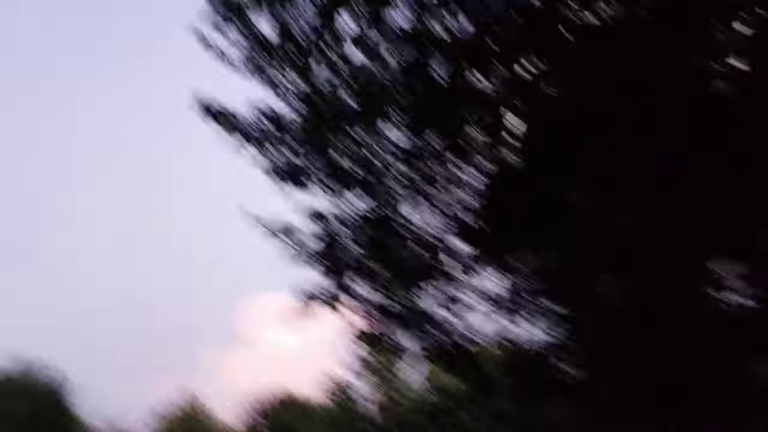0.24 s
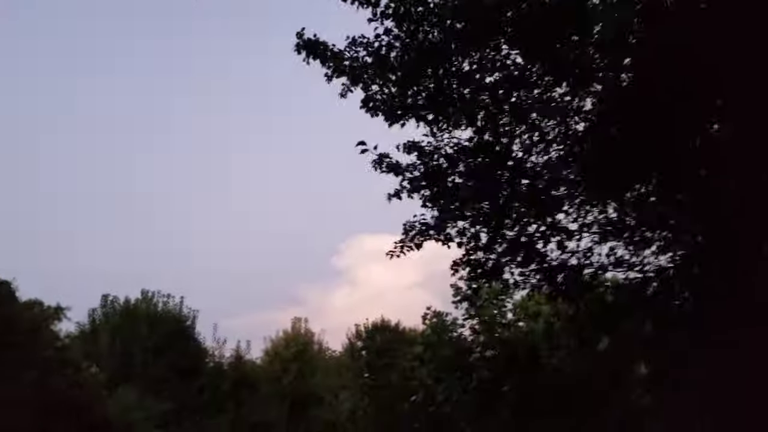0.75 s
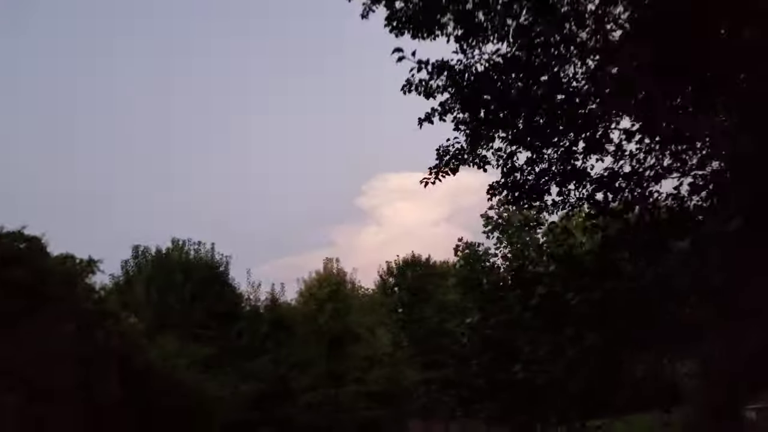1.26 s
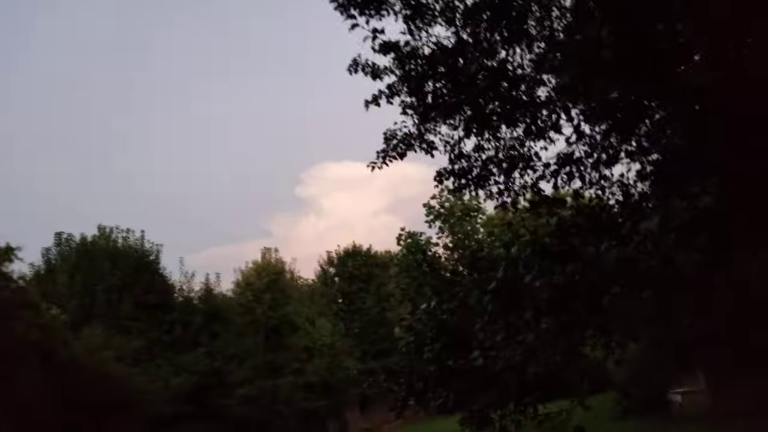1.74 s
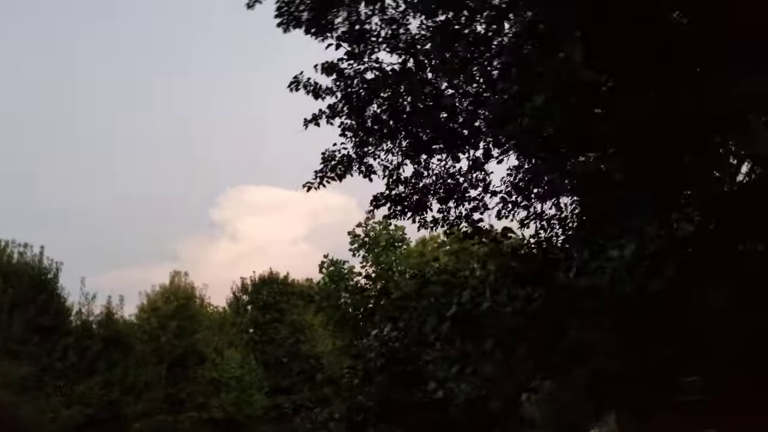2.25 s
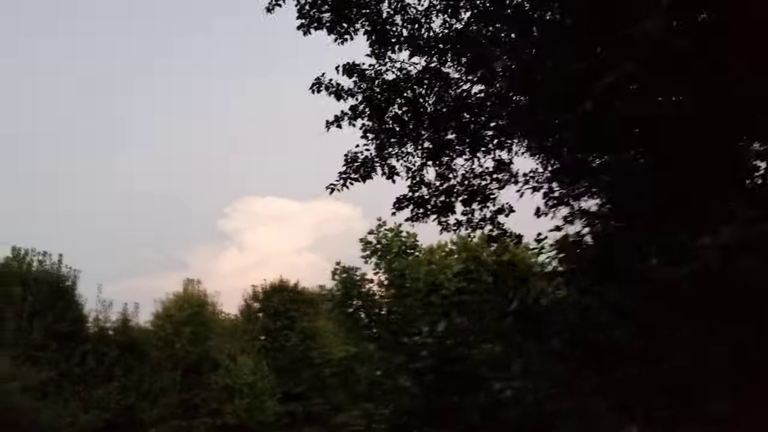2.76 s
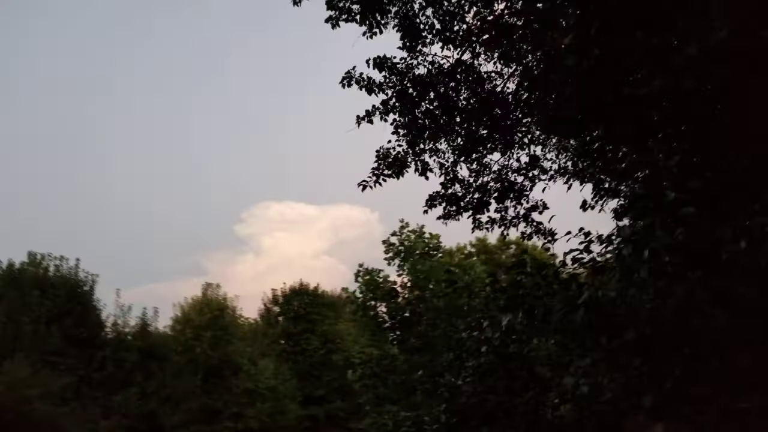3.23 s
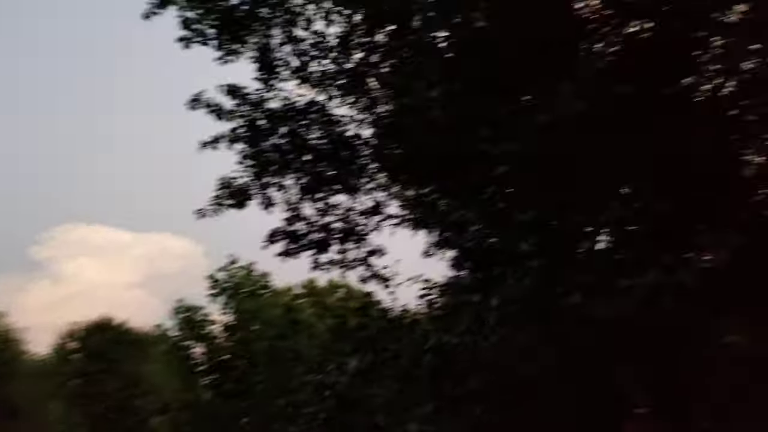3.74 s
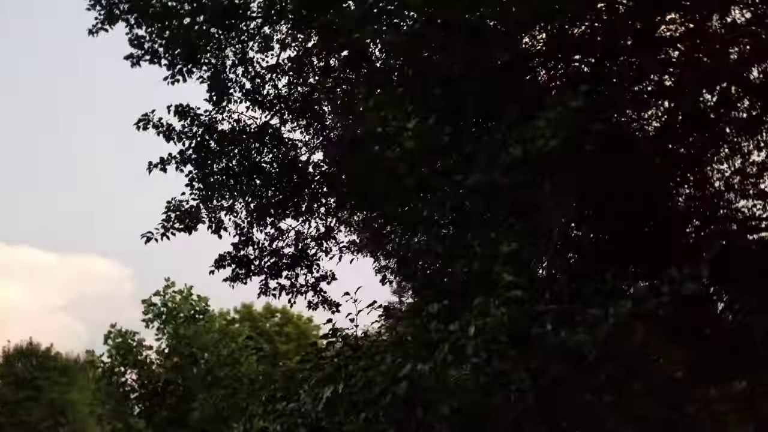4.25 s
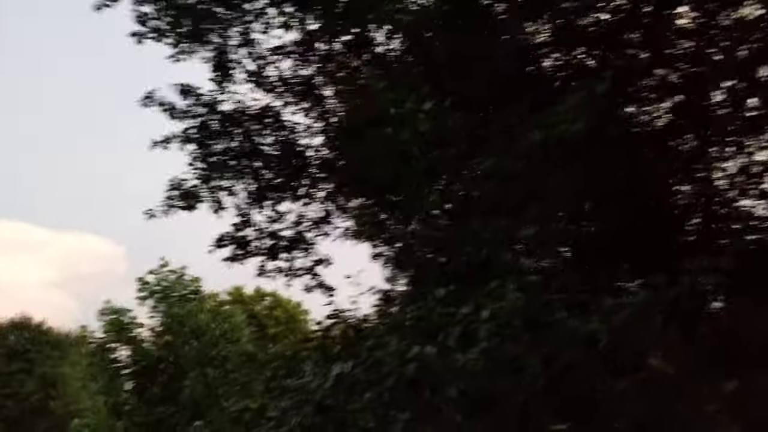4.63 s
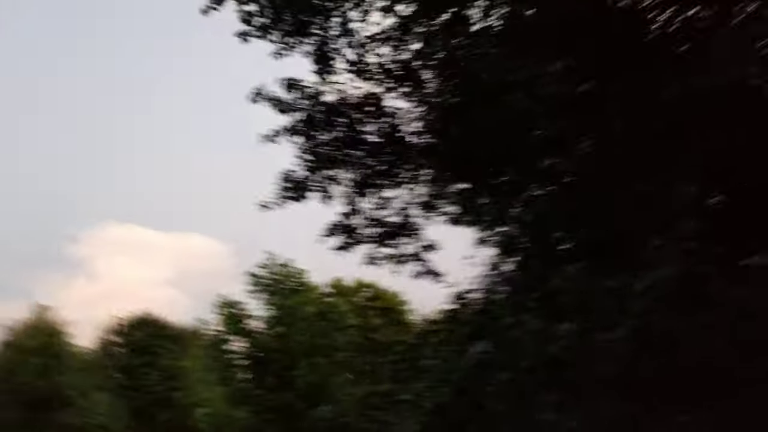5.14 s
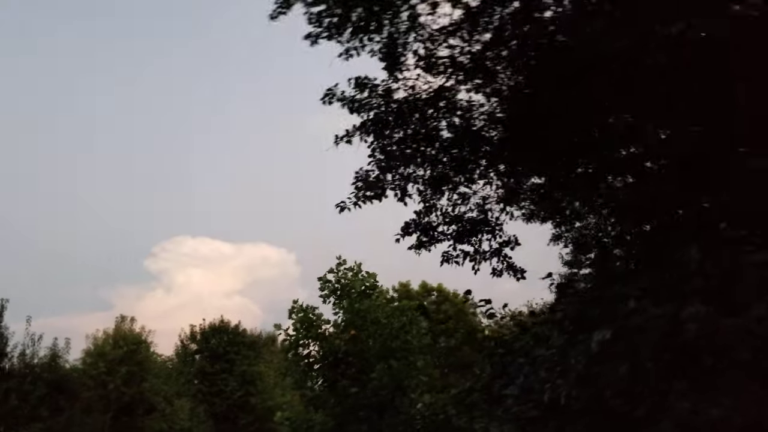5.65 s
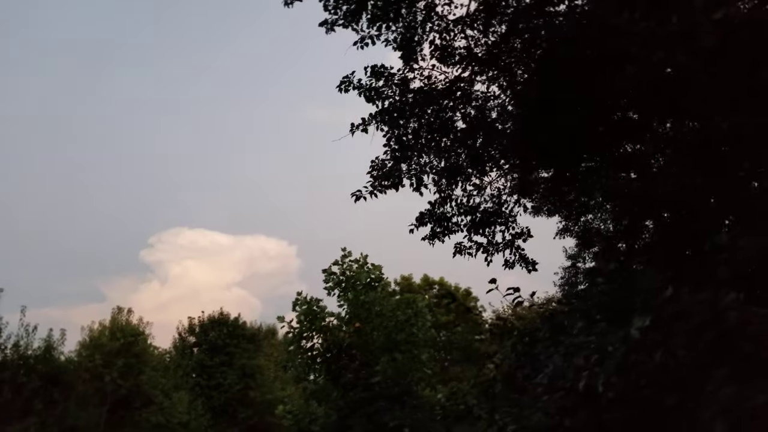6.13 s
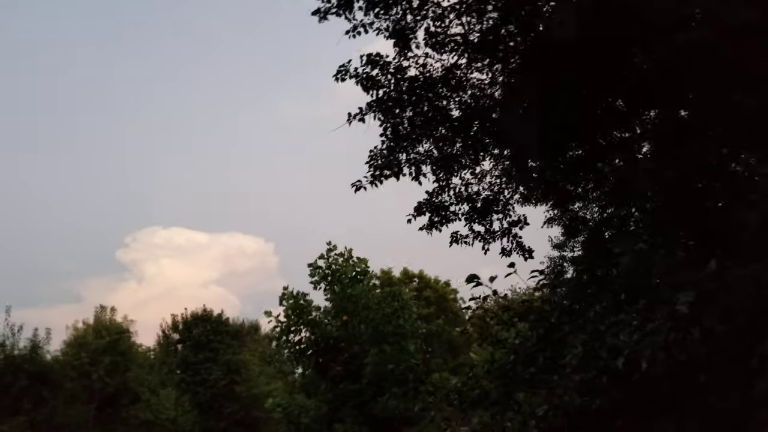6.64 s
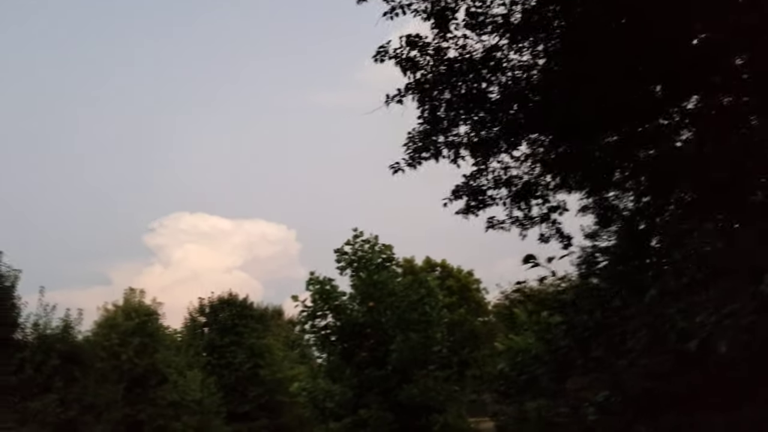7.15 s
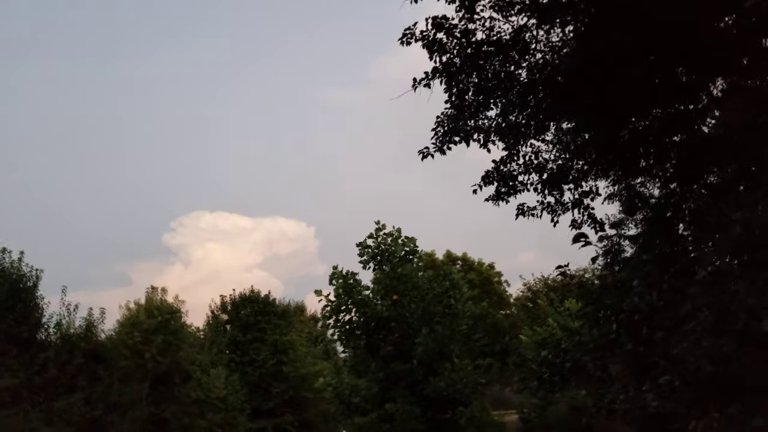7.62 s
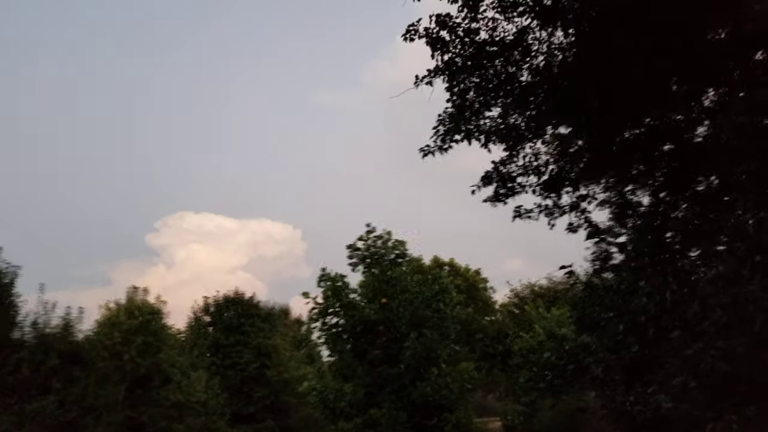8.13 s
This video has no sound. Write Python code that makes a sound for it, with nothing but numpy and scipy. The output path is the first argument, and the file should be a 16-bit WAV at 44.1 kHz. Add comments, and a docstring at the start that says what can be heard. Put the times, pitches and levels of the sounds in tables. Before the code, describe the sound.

Evening insects in trees: pulsing shrill katydids, a nearby cicada's buzz swelling with brief regular hitches, and a low cooling-unit rumble with faint whine.

```python
"""Dusk among trees. After half a second of silence a band of katydids fades in, throbbing four times a
second over a hiss of far cicadas, as a cooling unit rumbles and hums. One near cicada winds up from a slow,
slack buzz to a full one near 6 s, broken by short pauses: clicks ring its body and rasp in the treble.
From about 2 s the unit's rush of air and whine come forward; a hand-held stereo pair of ports turns a little.
After 5 s the katydids' throb grows shallower as they drift apart."""
import sys
import numpy as np
from scipy import signal
from scipy.fft import rfft, irfft, next_fast_len
from scipy.io import wavfile
from scipy.ndimage import map_coordinates

SR = 44100
rng = np.random.default_rng(int(sys.argv[2]) if len(sys.argv) > 2 else 0)


def wav_out(sig):
    """Save sig, one row per channel (or a flat mono array), as 16-bit PCM at SR to the path in sys.argv[1]."""
    wavfile.write(sys.argv[1], SR, np.round(np.clip(np.atleast_2d(sig).T, -1, 1) * 32767).astype(np.int16))


def convert_level_to_amplitude(level_db):
    """Map a level in decibels to its linear amplitude factor."""
    exponent = np.asarray(level_db, float) / 20
    return 10 ** exponent


N = 369558  # length in samples, about 8.4 s


def evened(x):
    """Scales so that the mean of the channels has rms 1."""
    mean_power = np.mean(np.atleast_2d(x).mean(0) ** 2)
    return x / np.sqrt(mean_power + 1e-20)


def read_spectrum(points, hz):
    """Reads a spectrum joined by straight lines on a log frequency axis."""
    point_hz, value = np.transpose(points)
    return np.interp(np.log(hz + 1), np.log(point_hz + 1), value)


def curves(rows):
    """Turns a table whose first column is time into one smooth-running curve per other column."""
    time_s, *values = np.transpose(rows)
    t = np.arange(N) / SR
    return [np.interp(t, time_s, v) for v in values]


def colour(x, points):
    """Filters by a spectrum in dB."""
    size = next_fast_len(N)
    gain = convert_level_to_amplitude(read_spectrum(points, np.fft.rfftfreq(size, 1 / SR)))
    return irfft(rfft(x, size) * gain, size)[..., :N]


def resonate(x, hz, width):
    """Shifts the curve hz to zero, smooths twice, shifts back: a steep resonance of gain 1."""
    turn = np.exp(2j * np.pi * np.cumsum(hz * np.ones(N)) / SR)
    r = np.exp(-np.pi * width / SR)
    smooth = signal.lfilter([(1 - r) ** 2], [1, -2 * r, r * r], x / turn)
    return 2 * (turn * smooth).real


def wander(top_hz, count=1):
    """Slow random curves of rms 1, low-passed at top_hz and drawn at one point per 100 samples."""
    lowpass = signal.butter(2, top_hz, fs=SR / 100, output="sos")
    slow = signal.sosfilt(lowpass, rng.standard_normal((count, N // 100 + 2)))
    return np.array([np.interp(np.arange(N) / 100, np.arange(len(r)), r / r.std()) for r in slow])


def clicks(per_s, spread_db, channels=1):
    """Random clicks of either sign, a few large."""
    shape = (channels, N)
    size = convert_level_to_amplitude(spread_db * np.minimum(rng.exponential(1, shape), 4))
    sign = rng.choice([-1., 1.], shape)
    return size * sign * (rng.random(shape) < per_s / SR)


def foliage(x, t60, sway_hz):
    """Trunks and boughs echo the sound differently to each port; the paths change as the hand sways."""
    t = np.arange(SR // 3) / SR
    tails = rng.standard_normal((3, 2, len(t))) * convert_level_to_amplitude(-60 * t / t60) * (t > .002)
    tails = tails / np.linalg.norm(tails[0, 0])
    # three echo paths take turns; their shares of power always add up to the same
    turn = np.pi * (sway_hz * np.arange(N) / SR + np.arange(3)[:, None] / 3)
    feeds = x * np.sqrt(2 / 3) * np.sin(turn)
    return signal.fftconvolve(feeds[:, None], tails, axes=2)[..., :N].sum(0)


# near cicada; slackness of the drum is 0 when taut, and the rasp is relative to the buzz
# columns: time_s, buzz_db, rasp_db, slackness [no unit]
SONG = [(1.4, -48, -16, 1.46), (1.9, -46.5, -9, 1.04), (2.7, -45, -7.5, 1.17), (3.6, -38.5, -12, .98),
        (4.65, -33.5, -14, 0.63), (5.25, -31.5, -10.5, .38), (5.6, -32.5, -12, .12),
        (6.6, -30.5, -15.5, 0.046), (7.3, -32.5, -8.5, 0.067), (8.38, -32.5, -11, 0.23)]
# the hand turns; columns: time_s, left_port_lag [samples]
LAG = [(2, -0.5), (3.4, -2), (5.7, 3.5), (8.38, 8.5)]
# the buzz stops for a moment; columns: middle_s, pause_db
PAUSES = [(1.712, -14), (2.063, -21), (2.433, -4), (2.76, -11), (3.073, -15), (3.368, -14), (3.669, -21),
          (3.953, -8), (4.226, -14), (4.506, -7), (4.783, -8), (5.08, -3.5), (5.381, -7), (5.727, -3.5),
          (6.111, -5), (6.506, -6.5), (6.893, -6), (7.249, -6), (7.59, -6), (7.922, -5), (8.265, -3.5)]
# air sac and drum membranes at full tension, and what each unit of slackness takes away
# columns: pitch_hz, width_hz [of each of two smoothings], level_db, drop_hz, weaker_db
BODY = [(2096, 226, -10, -8, 1.5), (2344, 88, -11.5, 59, -4.5), (2678, 330, -7.5, 97, -2),
        (2968, 132, 3, 85, 5), (3209, 284, -5.5, 62, -1.5), (3524, 170, -6.5, 204, 1.5),
        (3766, 200, -4, 282, 1), (4134, 560, -13.5, 90, 9.5), (4650, 580, -22, 2, 3),
        (5150, 430, -15.5, -6, 7.5)]
# shape of the treble rasp; columns: pitch_hz, level_db [per Hz]
RASP = [(5000, -65), (5900, -2.5), (7500, -10), (8300, -13), (8800, -8), (9400, 5.5), (11000, 4),
        (13000, -1.5), (14500, -5), (16000, -4)]
# extra level of the rasp's top treble; columns: time_s, level_db
TOP = [(1.4, -6), (4.4, 1.5), (5.5, 2.5), (5.8, 5), (6.9, 9), (7.3, 2), (8.38, 4.5)]
TOP_HZ = 12000  # the top treble starts here
TAUT_BEATS_HZ, SLACK_SLOWS_HZ = 239.2, 42.1  # average muscle beats per s; slowing per unit of slackness
STUTTER_SHARE = .7  # stutter depth as a share of the pause dB, per unit of slackness


def pauses_db(slack):
    """Each pause is a flat dip, then a short louder burst, then one stutter, deeper on a slack drum."""
    t = np.arange(N) / SR
    total_db = np.zeros(N)
    for s, db in PAUSES:
        dip = np.clip(1.6 - abs(t - s) / np.where(t < s, .008, .007), 0, 1)
        burst_db = 1.25 * np.exp(-((t - s - .019) / 0.011) ** 2)
        stutter = STUTTER_SHARE * slack * np.exp(-((t - s - .037) / .005) ** 2)
        total_db += db * dip + burst_db + db * stutter
    return total_db


def cicada():
    """Each muscle beat buckles a row of ribs: a burst of clicks that rings the body and rasps above it."""
    buzz_db, rasp_db, slack = curves(SONG)
    beat_hz = (TAUT_BEATS_HZ - SLACK_SLOWS_HZ * slack) * (1 + .012 * wander(30)[0])
    beat = np.cumsum(beat_hz) / SR % 1  # place within each beat, 0 to 1
    effort = (.5 + np.exp(-beat / 0.56)) * convert_level_to_amplitude(pauses_db(slack))
    ribs = evened(clicks(10000, 0.87)[0] * effort)
    left_time = np.arange(N) - curves(LAG)[0]
    left = map_coordinates(ribs, [left_time], order=5, mode="nearest")
    direct = np.array([left, ribs])
    # moving leaves return unrelated clicks whose power trails the effort by a few ms
    keep = np.exp(-1 / (0.0044 * SR))
    trail = np.sqrt(signal.lfilter([1 - keep], [1, -keep], effort ** 2))
    leaves = np.array([evened(c * trail) for c in clicks(15000, 1.5, channels=2)])
    trunks = foliage(ribs, .045, sway_hz=.7)
    low = direct + .75 * leaves + .85 * trunks
    high = direct + 1.1 * leaves + .75 * trunks
    body = np.zeros((2, N))
    for k, (hz, width, db, drop_hz, weaker_db) in enumerate(BODY):
        ring = resonate(low, hz - drop_hz * slack, width)
        # neighbouring modes swing in opposite phase
        body += (-1) ** k * convert_level_to_amplitude(db - weaker_db * slack) * ring
    rasp = evened(colour(high, RASP))
    highpass = signal.butter(3, TOP_HZ, "high", fs=SR, output="sos")
    top = signal.sosfiltfilt(highpass, rasp)
    rasp = rasp - top + convert_level_to_amplitude(curves(TOP)[0]) * top
    return convert_level_to_amplitude(buzz_db) * (evened(body) + convert_level_to_amplitude(rasp_db) * rasp)


# katydids fall out of step: the dips between crests change depth
# columns: time_s, crest_db, dip_db [relative to the crest]
CHORUS = [(.7, -34.5, -4.5), (1.8, -38.5, -7), (2.5, -37, -8.5), (3.7, -38.5, -6), (5, -37, -9),
          (6.2, -39, -3), (8.38, -40, -4)]
# ringing wings and their octave; columns: pitch_hz, width_hz [of the first resonance], level_db
WING = [(6564, 300, -4), (6900, 390, 3), (7177, 300, 1), (13750, 1600, -20.5)]
THROB_HZ, FIRST_CREST_S = 4.145, .72


def katydids():
    """Many wings scrape in step; each tooth strike rings the wing and its octave."""
    crest_db, dip_db = curves(CHORUS)
    throb = THROB_HZ * (np.arange(N) / SR - FIRST_CREST_S)
    level_db = crest_db + dip_db * np.sin(np.pi * throb) ** 2 + .5 * wander(3.7)[0]
    teeth = clicks(3500, 0.87, channels=2) * convert_level_to_amplitude(0.23 * wander(135, count=2))
    wings = np.zeros((2, N))
    for hz, width, db in WING:
        ring = resonate(teeth, hz, width)
        wings += convert_level_to_amplitude(db) * resonate(ring, hz, 1.16 * width)
    return convert_level_to_amplitude(level_db) * evened(wings)


# shape of far cicadas and leaves; columns: pitch_hz, level_db [per Hz, relative]
FAR = [(600, -6), (1600, -11.5), (2100, -6), (2500, 1.5), (3200, -10), (3900, -9.5), (5800, -13),
       (8200, -12), (9500, -11.5), (11500, -17.5), (12500, -39), (14500, -30), (16000, -47)]
FAR_DB = -47  # level around which the hiss drifts


def far_chorus():
    """So many distant callers that their clicks blur into a drifting hiss; one stand of trees is to the left."""
    left, right, stand = clicks(12000, 1.25, channels=3)
    early = np.roll(stand, -13)  # the stand reaches the left port 13 samples sooner
    drift_db = .6 * wander(3, count=2)
    both = np.array([left + 1.02 * early, right + 0.57 * stand])
    return convert_level_to_amplitude(FAR_DB + drift_db) * evened(colour(both, FAR))


# how alike the two ports hear the unit's noise; columns: pitch_hz, likeness [1 = the same]
SAME = [(60, 1), (270, 0.99), (500, 0.98), (900, 1), (1500, 0.85)]


def pair(points):
    """Noise of a given colour, nearly the same at both ports in the bass."""
    left, other = rfft(rng.standard_normal((2, N)))
    hz = np.fft.rfftfreq(N, 1 / SR)
    same = np.clip(read_spectrum(SAME, hz), -1, 1)
    right = same * left + np.sqrt(1 - same ** 2) * other
    return evened(irfft([left, right] * convert_level_to_amplitude(read_spectrum(points, hz)), N))


# the rush of air comes forward; columns: time_s, rush_db
UNIT = [(1.4, -88), (2.4, -53.5), (3.5, -50), (4.4, -46), (8.38, -47.5)]
# shape of the rumble; columns: pitch_hz, level_db [per Hz, relative]
RUMBLE = [(12, -49), (20, -25), (49, -9.5), (66, -11), (85, -4), (108, -7.5), (129, -3), (215, -3.5),
          (244, -6), (315, -4), (900, -25), (1170, -72), (1980, -120)]
RUMBLE_DB = -39.5
# shape of the rush of air; columns: pitch_hz, level_db [per Hz, relative]
RUSH = [(300, -10), (500, 2.5), (800, -8.5), (1200, -7), (1700, -8.5), (2300, -27.5)]
# fan tones; columns: pitch_hz, peak_db [wavers around this]
HUM = [(82.7, -42.5), (84.2, -46.5), (139, -50), (250, -48)]
# motor whine; columns: multiple [of the shaft speed], level_db [relative, wavers around this]
WHINE = [(14, -14), (15, -13), (17, -8), (18, -8.5), (19, -9), (20, -5), (21, 3.5), (22, -12), (23, -6),
         (31, -5)]
# the whine comes forward; columns: time_s, level_db
WHINE_LEVEL = [(1.5, -80), (2.35, -66.5), (3.5, -62), (3.8, -59.5), (4.8, -57.5), (8.38, -60)]
SHAFT_HZ = 58.83


def cooling_unit():
    """Steady rumble with wavering fan tones; its rush of air and motor whine come forward."""
    rush_db, whine_db = curves(UNIT)[0], curves(WHINE_LEVEL)[0]
    t = np.arange(N) / SR
    drift = wander(3.15, count=2 * len(HUM))  # one loudness and one phase curve per tone
    hum = np.zeros(N)
    for k, (hz, db) in enumerate(HUM):
        phase = 2 * np.pi * hz * t + 1.7 * drift[2 * k + 1]
        hum += convert_level_to_amplitude(db + 1.3 * drift[2 * k]) * np.sin(phase)
    shaft = 2 * np.pi * SHAFT_HZ * t + .025 * wander(1.5)[0]
    sway_db = 1.9 * wander(0.77, count=len(WHINE))  # each tone waxes and wanes by itself
    whine = np.zeros(N)
    for (multiple, db), sway in zip(WHINE, sway_db):
        whine += convert_level_to_amplitude(db + sway) * np.sin(multiple * shaft + 2 * np.pi * rng.random())
    rumble = convert_level_to_amplitude(RUMBLE_DB) * pair(RUMBLE)
    rush = convert_level_to_amplitude(rush_db) * pair(RUSH)
    return rumble + rush + hum + np.sqrt(2) * convert_level_to_amplitude(whine_db) * whine


def scene():
    """All callers and the machine together."""
    return cicada() + katydids() + far_chorus() + cooling_unit()


def low_pass(x):
    """Removes everything above the highest recorded frequency."""
    return signal.sosfilt(signal.butter(12, 16880, fs=SR, output="sos"), x)


# tone of the two ports; columns: pitch_hz, left_minus_right_db
BALANCE_DB = [(60, 0.5), (99, 0.5), (160, 0), (270, 0), (450, -2.5), (740, -1.5), (1220, -4), (2010, -8),
              (3330, -3), (5500, -10), (9080, -4), (11500, 0.5), (15500, -5)]
# fade-in, silent before the first row; columns: time_s, level_db
FADE = [(.528, -38.5), (.6, -26), (.68, -18.5), (.85, -12), (1.5, -5.5)]
EDGE_HZ = 15720  # nothing much passes above this


def record(dry):
    """The right port hears more of most of the treble; a band limit; silence, then a fade-in."""
    left = colour(dry[0], [(hz, db * .5) for hz, db in BALANCE_DB])
    right = colour(dry[1], [(hz, db * -.5) for hz, db in BALANCE_DB])
    lowpass = signal.firwin(801, EDGE_HZ, window=("kaiser", 9), fs=SR)
    ports = signal.oaconvolve(np.array([left, right]), lowpass[None], "same", axes=1)
    sounding = np.arange(N) >= FADE[0][0] * SR
    fade = convert_level_to_amplitude(curves(FADE)[0]) * sounding
    return low_pass(ports * fade)


dry = scene()
out = record(dry)
wav_out(out)
```